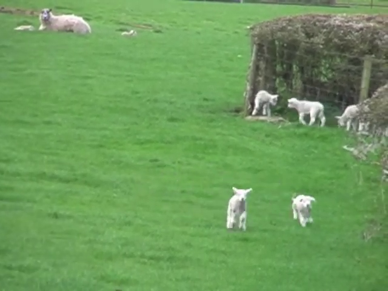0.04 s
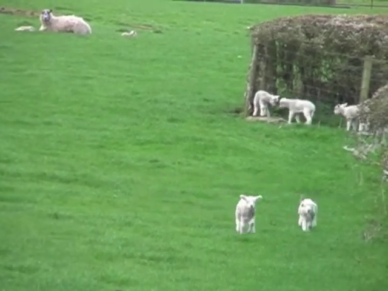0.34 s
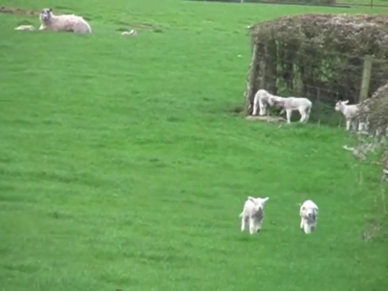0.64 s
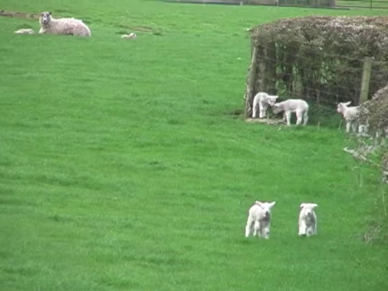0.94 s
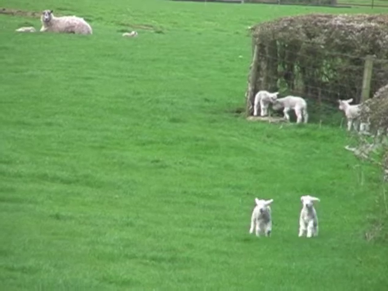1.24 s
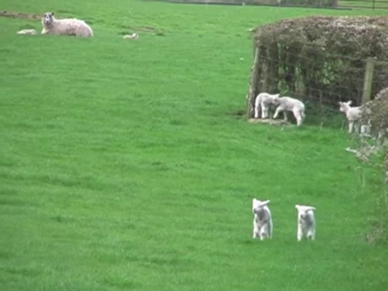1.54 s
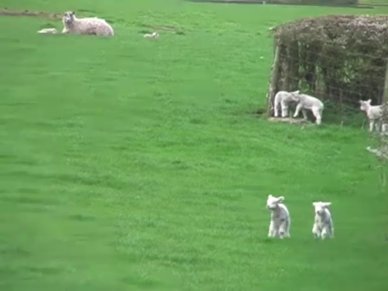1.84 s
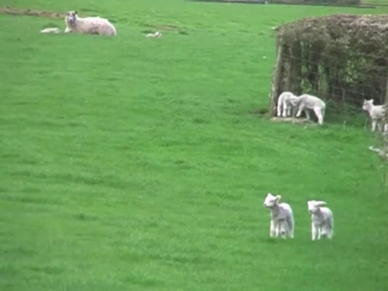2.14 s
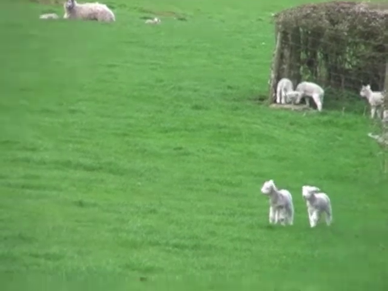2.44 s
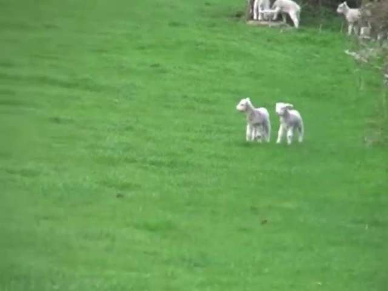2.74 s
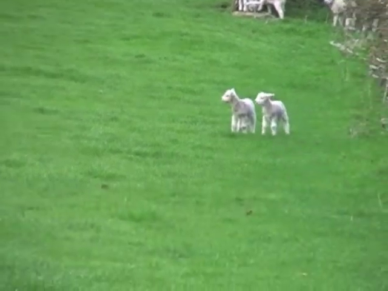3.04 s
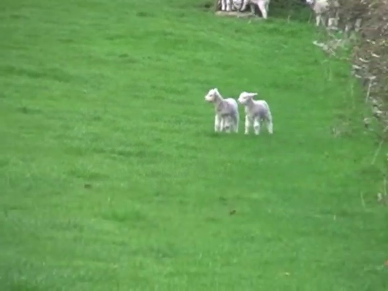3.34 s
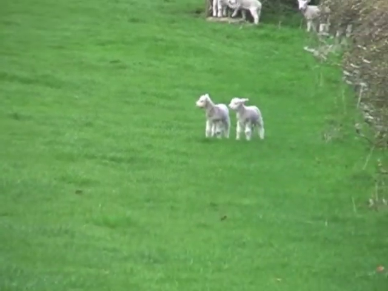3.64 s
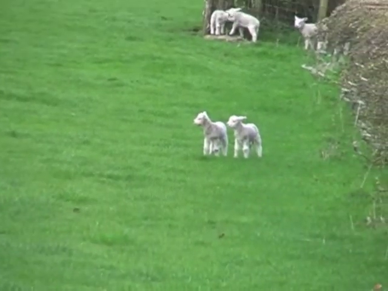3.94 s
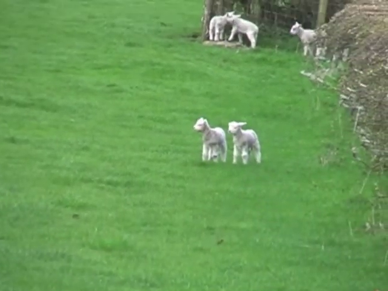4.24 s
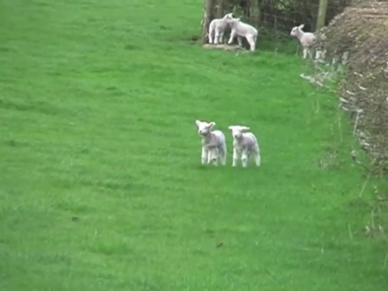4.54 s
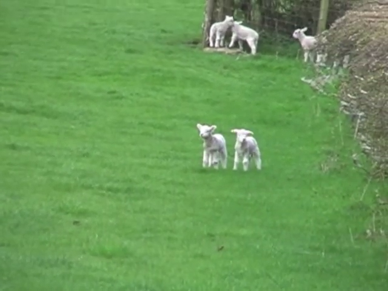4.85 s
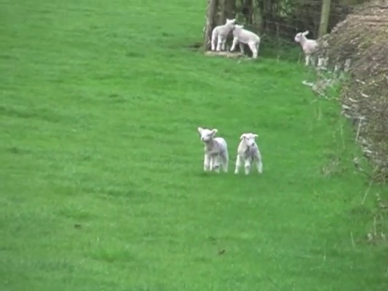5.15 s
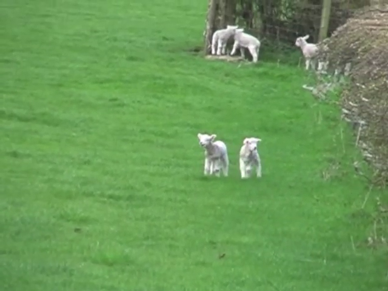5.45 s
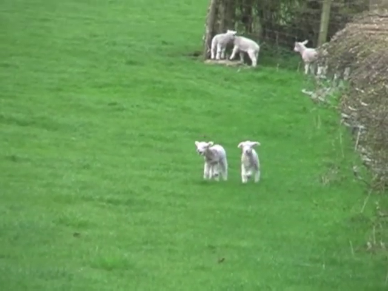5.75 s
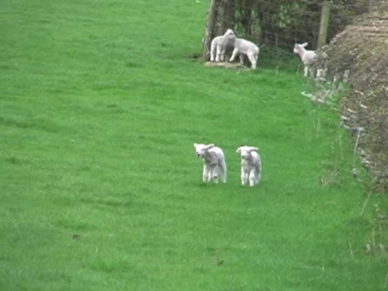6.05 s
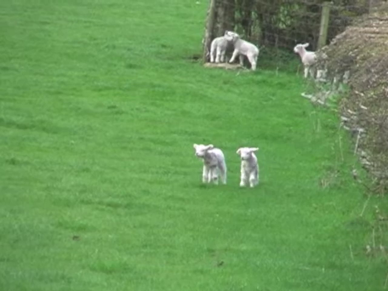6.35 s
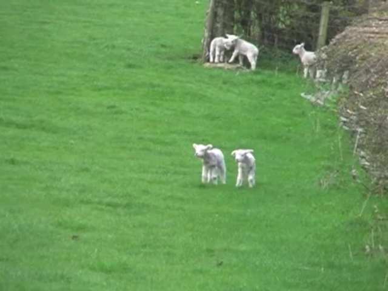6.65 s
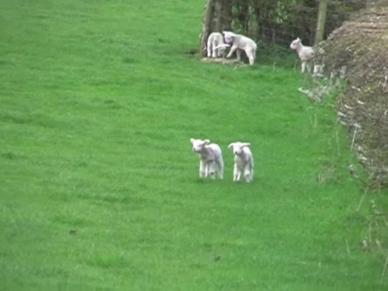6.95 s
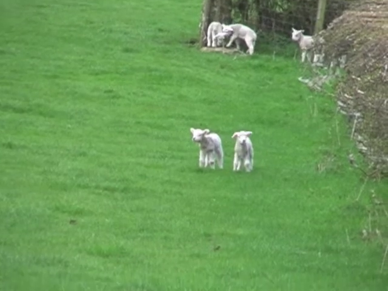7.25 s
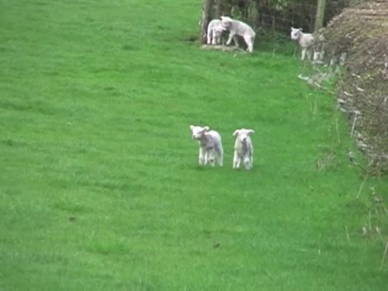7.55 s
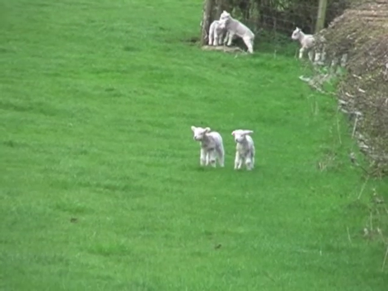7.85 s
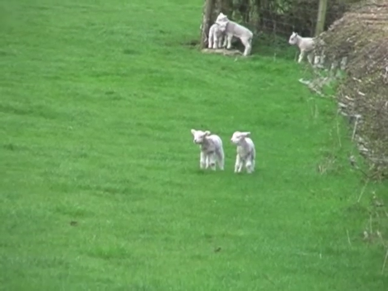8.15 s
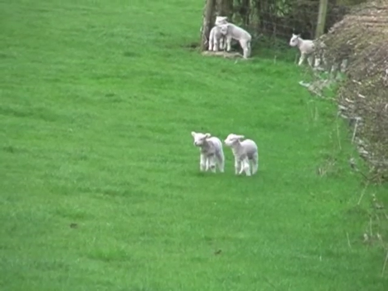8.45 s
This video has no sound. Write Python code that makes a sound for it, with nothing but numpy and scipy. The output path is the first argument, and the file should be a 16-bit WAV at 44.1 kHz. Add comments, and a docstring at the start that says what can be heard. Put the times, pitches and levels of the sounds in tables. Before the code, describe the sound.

Wavering lamb bleats and one low ewe call carry over open pasture, with a breeze rumbling on the microphone.

```python
"""Lambs bleat across an open field, each cry a chain of quavers, about 14 a second.
Their vocal folds snap shut and ring the throat; pitch sags and the voice roughens in every dip,
and some cries catch with a squeak. A ewe answers low and steady, and others call from far off.
Hedges scatter the calls and a dull echo returns. Over a soft hush, a gusty breeze buffets
the microphone and the camera clicks in the hand."""
import sys
import numpy as np
from scipy import signal
from scipy.fft import irfft, next_fast_len
from scipy.io import wavfile
from scipy.ndimage import map_coordinates

SR = 44100
rng = np.random.default_rng(int(sys.argv[2]) if len(sys.argv) > 2 else 0)


def pcm_store(signal):
    """Save signal as 16-bit PCM."""
    levels = np.round(np.clip(np.atleast_2d(signal), -1, 1) * 32767)
    wavfile.write(sys.argv[1], SR, levels.astype(np.int16).T)


N = 383669
TIME = np.arange(N) / SR

# Throat resonances of the stuttering lambs. Each row: frequency in Hz, gain in dB.
STUTTER_THROAT = [(300, -28), (800, -25.5), (1050, -8.5), (1360, -3), (1600, -16), (2450, -15.5), (3100, 3),
                  (3400, -8.5), (4150, -1.5), (5200, -14), (5700, -20), (6500, -22.5), (8500, -36.5),
                  (11000, -34.5), (13000, -64)]


def amp(db):
    """Decibels to gain."""
    return 10 ** (np.asarray(db) / 20)


def unit(x):
    """Scales to rms 1."""
    return x / np.sqrt(np.mean(x ** 2) + 1e-20)


def add(mix, s, sound):
    """Mixes a sound in at s seconds."""
    start = round(s * SR)
    sound = sound[max(-start, 0):]
    part = mix[max(start, 0):][:len(sound)]
    part += sound[:len(part)]


def colour(x, points, size=4096):
    """Causal filter with the given (Hz, dB) outline, so that each pulse rings after it strikes."""
    hz, db = np.transpose(points)
    log_hz = np.log(abs(np.fft.fftfreq(size, 1 / SR)) + 1)
    log_gain = np.log(amp(np.interp(log_hz, np.log(hz), db)))
    ring = np.fft.ifft(np.exp(np.conj(signal.hilbert(log_gain)))).real[:size // 2]
    return signal.oaconvolve(x, ring)[:len(x)]


def noise(points, count=N):
    """Noise of rms 1 with the given (Hz, dB) outline."""
    return unit(colour(rng.standard_normal(count), points))


def drift(count, hz):
    """Slow random wander of rms about 1."""
    f = np.fft.rfftfreq(N, 1 / SR)[:round(4 * hz * N / SR) + 2]
    lines = (rng.standard_normal((len(f), 2)) @ [1, 1j]) * np.exp(-(f / hz) ** 2)
    return unit(irfft(lines, next_fast_len(N, True)))[:count]


def air(level_db=-50.5, side_db=-17):
    """The even hush of open country."""
    # Tone of the hush. Each row: frequency in Hz, gain in dB.
    hush = [(15, -44), (25, -13.5), (107, -2), (216, -2), (284, -10), (437, -3), (604, -5.5), (981, -4),
            (1780, -5.5), (1980, -5), (2590, -9.5), (3050, -13.5), (4210, -18.5), (5670, -19.5),
            (15800, -30)]
    centre, side = noise(hush), noise(hush)
    swell_db = .5 * drift(N, 2)
    return amp(level_db + swell_db) * (centre + amp(side_db) * np.array([side, -side]))


def wind_power(side, rise=.46, fall=.6):
    """Power at one microphone port (side > 0 is left): a breeze, with gusts that rise and die away."""
    # The breeze. Each row: time in seconds, level in dB, leftward lean in dB.
    breeze = [(0, -57.5, 7), (.7, -37, 9), (1.1, -31.5, 3), (1.6, -38.5, 5), (2.1, -24.5, 4.5),
              (2.5, -30, 4.5), (2.92, -32, 1), (3.06, -37, -4), (3.62, -37.5, -3), (3.8, -54, 0),
              (3.95, -36.5, 7.5), (4.42, -32, 4), (4.601, -44, -2.5), (5.25, -41.5, -3), (5.42, -57.5, -6),
              (6.2, -40.5, -8.5), (6.601, -58, -9), (8.7, -62, -6)]
    # Gusts. Each row: crest time in seconds, peak in dB, nominal length in seconds, leftward lean in dB.
    gusts = [(0.129, -39, 0.039, 13), (.21, -38, .06, 6), (0.504, -37, 0.082, 11), (0.941, -30, 0.063, 8),
             (1.809, -27.5, .07, 3), (2.1, -20.5, 0.071, 1), (2.687, -24.5, 0.069, 3), (2.914, -28, .05, 2),
             (3.383, -29.5, 0.042, 4), (4.38, -26.5, 0.12, 3), (5.68, -46, 0.1, -1), (5.946, -42, .04, -16),
             (6.274, -38, 0.043, -9), (6.47, -40.5, .04, -11), (6.994, -44.5, 0.037, -10),
             (7.348, -46.5, 0.032, -11), (7.79, -47.5, 0.065, 1), (8.126, -41.5, 0.099, 6.5),
             (8.267, -45.5, 0.11, 3)]
    s, level_db, pan_db = np.transpose(breeze)
    pan = 2 / (1 + amp(-side * np.interp(TIME, s, pan_db)) ** 2)
    power = amp(np.interp(TIME, s, level_db)) ** 2 * pan
    for crest, peak_db, length, lean_db in gusts:
        t = np.arange(-2 * length, 2 * length, 1 / SR)
        swell = np.exp(-(t / (length * np.where(t < 0, rise, fall))) ** 2)
        add(power, crest + t[0], swell * amp(peak_db) ** 2 * 2 / (1 + amp(-side * lean_db) ** 2))
    return power


def wind(lump_db=3, flicker_db=1, fizz_db=-28, full_gust_db=-19, fizz_growth=3.6, opposed=.14):
    """Eddies hit each microphone port separately; strong gusts also hiss."""
    # Tone of the low buffeting and of the hiss. Each row: frequency in Hz, gain in dB.
    buffet_tone = [(15, -73), (25, -47), (50, -15), (95, -0.5), (140, -2), (220, 1.5), (300, -7), (420, -9),
                   (600, -19.5), (900, -25), (1400, -40), (2400, -76)]
    fizz_tone = [(20, -51), (300, -6), (700, -16), (1200, -27), (2500, -43), (6000, -60), (10000, -62),
                 (16000, -56)]
    powers = np.array([wind_power(.92), wind_power(-1.07)])
    level_db = 10 * np.log10(powers.mean(0))
    ports = []
    for share in powers / powers.mean(0):
        lumps = unit(amp(lump_db * drift(N, 25) + flicker_db * drift(N, 120)))
        body = noise(buffet_tone) * amp(level_db)
        fizz = noise(fizz_tone) * amp(fizz_db + fizz_growth * (level_db - full_gust_db))
        ports.append((body + fizz) * lumps * np.sqrt(share))
    ports = np.array(ports)
    return ports - opposed * ports[::-1]  # the two sides swing partly against each other


def handling():
    """Dry ticks and one soft rub of the hand sliding on the camera."""
    # Swell of the rub. Each row: time in seconds, level in dB.
    rub_swell = [(1.3, -60), (1.33, -46), (1.38, -38), (1.43, -29.5), (1.46, -34.5), (1.5, -55)]
    # Tone of the rub. Each row: frequency in Hz, gain in dB.
    rub_tone = [(200, -18), (600, -7.5), (900, 2), (1200, -9), (1600, -6.5), (2500, -16), (6000, -23),
                (15000, -36)]
    # Ticks. Each row: start in seconds, level in dB, centre in Hz, width in octaves, decay in seconds.
    clicks = [(.892, -23, 5440, 0.45, 0.0045), (.917, -21, 5000, 1.2, 0.0027),
              (.991, -19.5, 2377, 0.65, 0.0027), (1.198, -22, 3920, 0.34, 0.0023),
              (1.312, -28, 900, .6, 0.0077), (1.587, -35, 5000, 1.1, .002), (1.74, -38, 5970, 0.64, 0.0017),
              (1.823, -24.5, 1950, 1.46, 0.0081), (1.836, -41, 2430, 1.2, 0.02),
              (1.878, -41, 5000, 0.87, .003), (2.113, -16.5, 566, 0.77, 0.0039),
              (2.379, -38, 5460, 0.31, 0.0011), (5.96, -38, 6970, 1.1, 0.00089),
              (7.765, -37, 1470, 0.91, 0.0057), (7.898, -37, 1700, 0.69, 0.0029),
              (8.013, -44, 1200, 0.68, 0.0089)]
    out = noise(rub_tone) * amp(np.interp(TIME, *np.transpose(rub_swell), left=-200, right=-200))
    t, hz = TIME[:4096], np.geomspace(50, 16000, 30)
    for s, level_db, centre_hz, octaves, decay in clicks:
        outline_db = -14 * np.log10(1 + (np.log2(hz / centre_hz) / octaves) ** 4)
        grit = noise(np.c_[hz, outline_db], len(t))
        add(out, s, amp(level_db) * grit * np.exp(-t / decay))
    return out


def scatter(x, delay, t60):
    """Many small reflections from hedges and turf that begin after a delay and die away."""
    taps = rng.standard_normal(SR) * (rng.random(SR) < .05) * amp(-60 * TIME[:SR] / t60)
    taps = np.r_[np.zeros(round(delay * SR)), taps / np.linalg.norm(taps)]
    return signal.oaconvolve(x, taps)[:N]


def bounces(calls):
    """Hard reflections from turf, hedge and bank, leaning right."""
    # Each row: delay in seconds, gain in dB.
    reflections = [(.0012, -38), (.0046, -13), (0.0135, -26.5), (0.026, -17.5), (0.042, -18.5)]
    out = np.zeros(N)
    for delay, db in reflections:
        add(out, delay, amp(db) * calls)
    return out * amp([[-2], [2]])


def field_echo(calls, delay_s=.43):
    """A dull, smeared echo from the far side of the field."""
    # Tone of the echo. Each row: frequency in Hz, gain in dB.
    echo_tone = [(200, -35), (1000, -11), (1600, 5.5), (2300, -26), (3200, -28), (6000, -39)]
    echo = np.zeros(N)
    add(echo, delay_s, amp(-20.5) * colour(calls, echo_tone))
    return echo + amp(-6) * scatter(echo, delay=.012, t60=.6)


def voice(hz, rough, lift_db, throat, lift_hz=3700):
    """Vocal folds snap shut once a cycle, unevenly when rough, and ring the throat."""
    count = len(hz)
    rough = np.clip(rough, 0, 1)
    jitter = .005 * rough + .05 * rough ** 2
    rasp = .27 * rough + .3 * rough ** 2
    cycles = np.cumsum(hz * (1 + jitter * drift(count, 137.7))) / SR
    closures = np.interp(np.arange(1, int(cycles[-1])), cycles, np.arange(count))
    strength = np.exp(.4 * rough[closures.astype(int)] * rng.standard_normal(1000)[:len(closures)])
    # each closure is a short pulse placed between samples
    taps = closures.astype(int)[:, None] + np.arange(-7, 9)
    offset = taps - closures[:, None]
    pulses = strength[:, None] * np.sinc(offset) * np.sinc(offset / 8)
    folds = np.zeros(count)
    np.add.at(folds, np.clip(taps, 0, count - 1), pulses)
    # turbulence after each closure
    puffs = unit((.3 + np.exp(-(cycles % 1) / .46)) * rng.standard_normal(2 * SR)[:count])
    sound = colour(unit(folds) + rasp * puffs, throat)
    treble = signal.sosfiltfilt(signal.butter(3, lift_hz, "high", fs=SR, output="sos"), sound)
    return unit(sound + (amp(lift_db) - 1) * treble)


def moving_voice(hz, rough, lift_db, mouth, throat):
    """A raised larynx and a wide mouth shorten the throat, so that it rings faster at the same pitch."""
    throat_time = np.cumsum(mouth)
    steps = np.arange(int(throat_time[-1]) + 2)
    controls = (np.interp(steps, throat_time, c) for c in (hz / mouth, rough, lift_db))
    return map_coordinates(voice(*controls, throat), [throat_time], order=3)


def far_ewes(width_hz=280, rough=.1, waver=.0075):
    """Far and half-voiced ewes: short, arched, wavering calls through a gliding mouth resonance."""
    # Each row: start and length in seconds, first and last pitch in Hz, level in dB,
    # first and last mouth resonance in Hz.
    calls = [(.64, 0.49, 164.8, 175.3, -46, 1584, 2033), (2.28, 0.51, 184.2, 175, -54, 1490, 1790),
             (4.13, 0.3, 75.5, 84.4, -46.5, 1800, 1680), (4.323, 0.096, 110.5, 156.8, -37, 1820, 2110),
             (5.08, 0.23, 173.3, 151.3, -46, 1645, 1391), (5.3, 0.38, 148.7, 137.3, -55, 900, 840),
             (6.6, 0.41, 160, 174.8, -51.5, 1280, 1520), (6.78, .34, 173, 195.4, -55.5, 1880, 2640),
             (7.1, 0.89, 190.3, 197.7, -56.5, 2230, 2400)]
    # Their throat resonances. Each row: frequency in Hz, gain in dB.
    throat = [(300, -22), (850, -7.5), (1350, -6.5), (2200, -10), (3200, -16), (5000, -17), (9000, -52)]
    out = np.zeros(N)
    pole = np.exp(-np.pi * width_hz / SR)
    for s, length, first_hz, last_hz, level_db, mouth_from, mouth_to in calls:
        along = np.linspace(0, 1, round(length * SR))
        bend = 1 + .03 * np.sin(np.pi * along) + waver * drift(len(along), 13.7)
        hz = (first_hz + (last_hz - first_hz) * along) * bend
        call = voice(hz, np.full(len(hz), rough), 0, throat)
        glide = np.exp(2j * np.pi * np.cumsum(mouth_from + (mouth_to - mouth_from) * along) / SR)
        call = (glide * signal.lfilter([1 - pole], [1, -pole], call / glide)).real
        add(out, s, amp(level_db) * unit(call) * signal.windows.tukey(len(hz), .5))
    return out


def ewe(rough_held=.24, creak_hz=143, creak=1.5):
    """One low, even call that opens out; the folds creak as the pitch drops."""
    # Her call. Each row: time in seconds, pitch in Hz, level in dB, treble lift in dB.
    call = [(4.44, 128.5, -53, -4), (4.5, 138.9, -42.5, -15), (4.58, 143.3, -25.5, -11),
            (4.66, 147.2, -25.5, -2), (4.735, 147.7, -26.5, 2), (4.8, 149.8, -31, 3.5), (4.88, 153, -27, 1),
            (4.98, 151.5, -29, 3), (5.06, 141, -25.5, 1), (5.095, 90.7, -35, -3), (5.138, 75, -49, -9)]
    # Her mouth opening. Each row: time in seconds, factor on the throat's resonances.
    opening = [(4.44, 1.08), (4.58, 1.02), (4.85, 1), (4.97, 1.01), (5.05, 1.06), (5.14, 1.16)]
    # Her throat resonances. Each row: frequency in Hz, gain in dB.
    throat = [(150, -41), (310, -20), (450, -10.5), (650, -30), (950, -27.5), (1380, 0), (1600, -12),
              (1950, 6), (2450, -7.5), (2900, -5), (3400, -26.5), (4050, -14), (5700, -25.5), (7500, -39),
              (10000, -47), (13000, -65)]
    s, *columns = np.transpose(call)
    t = np.arange(s[0], s[-1], 1 / SR)
    hz, level_db, lift_db = (np.interp(t, s, c) for c in columns)
    rough = rough_held + creak * np.maximum(1 - hz / creak_hz, 0)
    mouth = np.interp(t, *np.transpose(opening))
    return t[0], amp(level_db) * moving_voice(hz, rough, lift_db, mouth, throat)


def squeaks(overtone_db=-17, flutter=.55, folds_hz=330):
    """Thin whistles as a lamb's voice catches, fluttered by the folds as they start to swing."""
    # Each row: start and length in seconds, first, middle and last pitch in Hz, level in dB.
    catches = [(2.961, 0.061, 2580, 2630, 2560, -51), (5.408, 0.036, 2540, 2630, 2800, -40.5),
               (5.493, 0.031, 2700, 2730, 2900, -38.5), (8.144, 0.045, 2830, 2670, 3100, -41),
               (8.623, .04, 4160, 4240, 4500, -43.5)]
    out = np.zeros(N)
    for s, length, *pitches, level_db in catches:
        t = np.arange(0, length, 1 / SR)
        hz = np.interp(t, [0, length / 2, length], pitches) * (1 + .013 * drift(len(t), 150))
        tone = sum(amp(overtone_db * k) * np.sin(2 * np.pi * (k + 1) * np.cumsum(hz) / SR) for k in range(3))
        tone *= 1 + flutter * np.sin(2 * np.pi * folds_hz * t)
        add(out, s, amp(level_db) * unit(tone) * np.hanning(len(t)))
    return out


def lamb(cry, throat, quaver_hz, sag, loose_db, held_db, settle_s, break_s, rough_ends, rough_held):
    """A cry starts in rough quavers, settles while held and breaks up again; pitch sags in every dip."""
    fade_s, dip_spread, half_sag_db = .04, .246, 4
    rough_per_db, dull_per_db = .09, .26  # a dip roughens the folds and takes away treble
    s, *controls = np.transpose(cry)
    t = np.arange(s[0] - fade_s, s[-1] + fade_s, 1 / SR)
    crest_hz, effort_db, lift_db = (np.interp(t, s, c) for c in controls)
    # every point of the cry is a crest, with a whole number of quavers to the next
    crests = np.r_[0, np.cumsum(np.maximum(np.round(np.diff(s) * quaver_hz), 1))]
    beat = np.interp(t, np.r_[s[0] - 2 * fade_s, s, s[-1] + 2 * fade_s], np.r_[-1, crests, crests[-1] + 1])
    # no two quavers are shaped alike
    lean, reach, depth = rng.uniform(-1, 1, size=(32, 3))[np.maximum(beat, 0).astype(int)].T
    trough = np.sin(np.pi * (beat + .13 * lean * np.sin(np.pi * beat) ** 2)) ** 2
    settled = np.maximum(np.minimum((t - s[0]) / settle_s, (s[-1] - t) / break_s), 0)
    dip_db = abs((held_db + (loose_db - held_db) * np.exp(-settled ** 2)) * (1 + dip_spread * depth))
    rasp = np.exp(-(settled / 1.35) ** 2)  # settles more slowly than the quaver
    rough = rough_held + (rough_ends - rough_held) * rasp + rough_per_db * dip_db * trough
    slack = sag * (1 + dip_spread * reach) * trough ** 1.1 + .00832 * drift(len(t), 35.3)
    hz = crest_hz * (1 - slack * dip_db / (dip_db + half_sag_db))
    larynx = (hz / np.median(hz)) ** .33
    opening = 1 + .003 * (effort_db - np.median(effort_db))
    mouth = larynx * opening * (1 + .012 * drift(len(t), 10))
    sound = moving_voice(hz, rough, lift_db - dull_per_db * dip_db * trough, mouth, throat)
    fade = np.clip(np.minimum(t - t[0], t[-1] - t) / fade_s, 0, 1)
    return t[0], fade * amp(effort_db - dip_db * trough ** 1.08) * sound


def distant_lambs():
    """Two long, reedy bleats and a faint stutter from across the field."""
    # The cries. Each row: time in seconds, pitch in Hz, level in dB, open-mouth treble lift in dB.
    opening_cry = [(-.05, 345.3, -29.5, 2), (.085, 342.9, -32, 5.5), (.228, 340.5, -31.3, 4),
                   (.385, 341.3, -31.5, 2.5), (.583, 344, -35, -2), (.815, 335, -37.5, -4),
                   (.96, 336.4, -35.5, 6.5)]
    long_cry = [(2.99, 325.4, -47, 9), (3.06, 336, -37, 0), (3.205, 348, -33, -1.5),
                (3.43, 341.8, -32.5, -.5), (3.58, 332.8, -35.5, 0), (3.805, 333.4, -33, 2),
                (3.972, 314, -34.5, 0)]
    faint_cry = [(7.365, 313, -62, 9), (7.437, 332.4, -52, 6), (7.608, 320.4, -55, 2),
                 (7.69, 319, -49.5, 3), (7.853, 321.4, -49.5, -1), (8.1, 308, -58, 1)]
    # Throat resonances. Each row: frequency in Hz, gain in dB.
    reedy_throat = [(500, -40), (1100, -11.5), (1340, -1), (1600, -10.5), (2350, -11.5), (3080, 3),
                    (3750, -11), (4450, -3.5), (5000, -16), (5700, -11.5), (6100, -23.5), (6950, -19.5),
                    (7500, -30), (10000, -35.5), (10900, -27.5), (13000, -58)]
    out = np.zeros(N)
    add(out, *lamb(opening_cry, reedy_throat, quaver_hz=15.7, sag=.12, loose_db=9.5, held_db=3,
                   settle_s=.19, break_s=.051, rough_ends=.344, rough_held=.088))
    add(out, *lamb(long_cry, reedy_throat, quaver_hz=13.4, sag=.12, loose_db=14.5, held_db=3.5,
                   settle_s=.12, break_s=.16, rough_ends=.284, rough_held=.15))
    add(out, *lamb(faint_cry, STUTTER_THROAT, quaver_hz=12, sag=.15, loose_db=19, held_db=20.5,
                   settle_s=.1, break_s=.12, rough_ends=.45, rough_held=.28))
    return out


def near_lambs():
    """Four close bleats: two settle into a held note, two stutter throughout."""
    # The cries. Each row: time in seconds, pitch in Hz, level in dB, open-mouth treble lift in dB.
    first_cry = [(.95, 275.7, -36, 8), (1.033, 288, -20, 1), (1.112, 302.2, -22.5, 6),
                 (1.245, 295, -21.5, 4.5), (1.315, 288.5, -22.5, 1), (1.4, 294.7, -21, -3),
                 (1.53, 284.7, -23.5, -12), (1.65, 264.6, -32.5, -1)]
    loud_cry = [(5.473, 294.4, -40, 5), (5.557, 305.8, -30, 7.5), (5.625, 330.5, -16.5, -1.5),
                (5.755, 330.3, -15, -2.2), (5.885, 337.5, -15, -3.8), (5.98, 323.7, -16.5, -2.5),
                (6.135, 306.3, -22.5, 5.5), (6.21, 271, -30.5, 4)]
    answering_cry = [(5.425, 321.8, -47.5, -4), (5.512, 349.1, -39, 4), (5.75, 344.7, -31, -11),
                     (5.99, 338, -37.5, 0), (6.243, 326, -31, 0.5), (6.335, 297.6, -34.5, 0)]
    stutter_cry = [(8.16, 345.7, -42, 9), (8.238, 342, -25.5, 4.5), (8.308, 350.5, -24.5, 3.5),
                   (8.377, 345.5, -26.5, 4), (8.447, 331, -29, 1.5), (8.522, 350.3, -23, -6),
                   (8.603, 343.4, -28, -6.5)]
    # Throat resonances. Each row: frequency in Hz, gain in dB.
    first_throat = [(300, -53), (1100, -27), (1450, -8.5), (1750, -19.5), (2650, -14), (3250, 2),
                    (3600, -3.5), (4150, -1), (5200, -14), (7000, -30.5), (8600, -45), (9900, -31.5),
                    (11500, -38.5), (14000, -62)]
    loud_throat = [(300, -37), (1000, -40.5), (1350, -19), (1700, -21), (2330, -16), (2680, -19),
                   (3050, -1.5), (3350, 0), (3700, -10), (4250, -5.5), (5100, -20), (7800, -55.5),
                   (9700, -40.5), (11400, -49), (13000, -77)]
    out = np.zeros(N)
    add(out, *lamb(first_cry, first_throat, quaver_hz=14, sag=.08, loose_db=20, held_db=2.3,
                   settle_s=.16, break_s=.0604, rough_ends=.353, rough_held=.05))
    add(out, *lamb(loud_cry, loud_throat, quaver_hz=13.5, sag=.1, loose_db=21, held_db=.2,
                   settle_s=.105, break_s=.06, rough_ends=.505, rough_held=.02))
    add(out, *lamb(answering_cry, STUTTER_THROAT, quaver_hz=12.3, sag=.2, loose_db=20.5, held_db=14,
                   settle_s=.202, break_s=.101, rough_ends=.293, rough_held=.22))
    add(out, *lamb(stutter_cry, STUTTER_THROAT, quaver_hz=13.8, sag=.22, loose_db=18, held_db=12,
                   settle_s=.1405, break_s=.024, rough_ends=.32, rough_held=.15))
    return out


def scene():
    """Near and distant animals, the field's reflections, wind and handling."""
    near = near_lambs()
    add(near, *ewe())
    distant = distant_lambs()
    near += squeaks()
    far = far_ewes()
    hedges = scatter(amp(-20) * near + amp(-16) * distant + amp(-8) * far, delay=.004, t60=.25)
    flock = near * amp([[-.55], [.55]]) + distant * amp([[-.3], [.3]]) + amp(-3) * far
    calls = near + distant
    return flock + bounces(calls) + hedges + field_echo(calls) + handling() + wind() + air()


def record(dry):
    """The microphone's low cut and the camera's band limit."""
    low_cut_hz, edge_hz = 38, 15850
    dry = signal.sosfilt(signal.butter(3, low_cut_hz, "high", fs=SR, output="sos"), dry)
    band_limit = signal.firwin(511, edge_hz, window=("kaiser", 9), fs=SR)
    return signal.oaconvolve(dry, band_limit[None], "same")


dry = scene()
out = record(dry)
pcm_store(out)
```